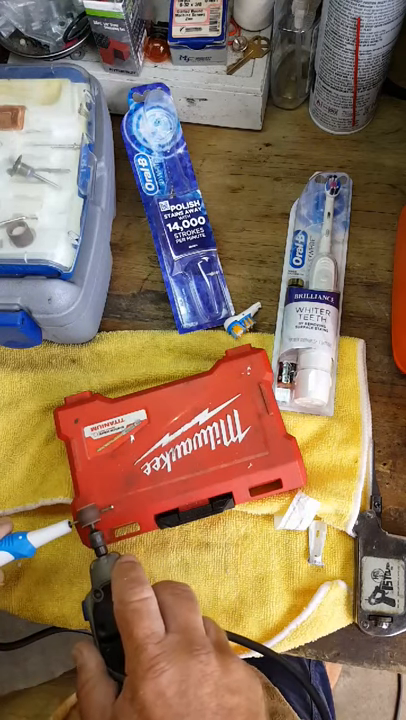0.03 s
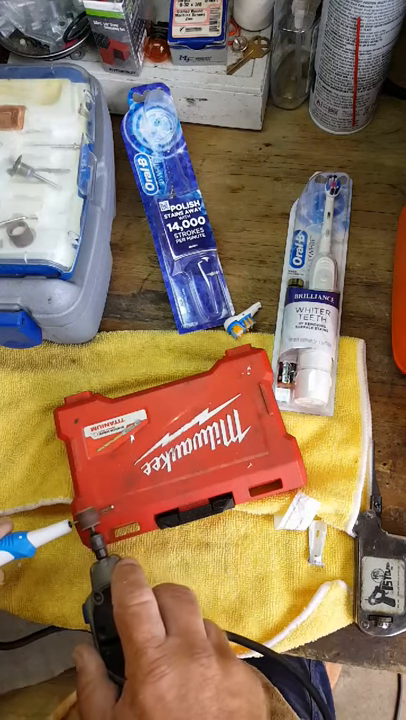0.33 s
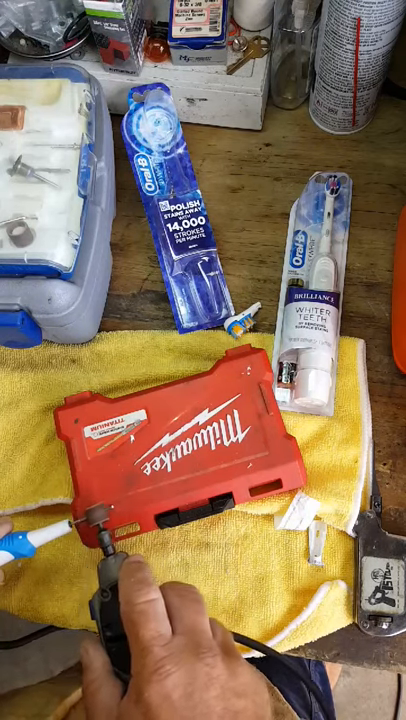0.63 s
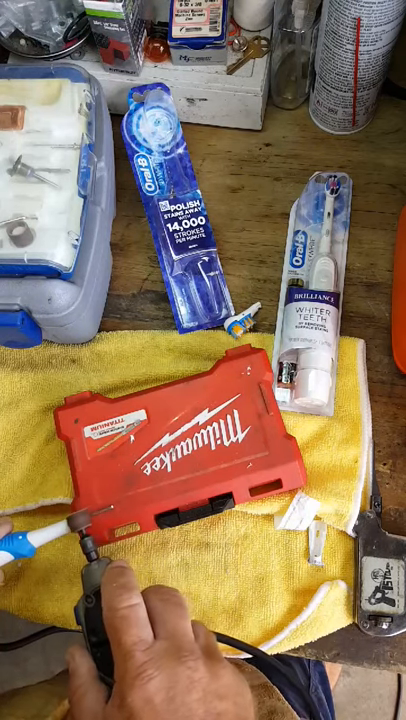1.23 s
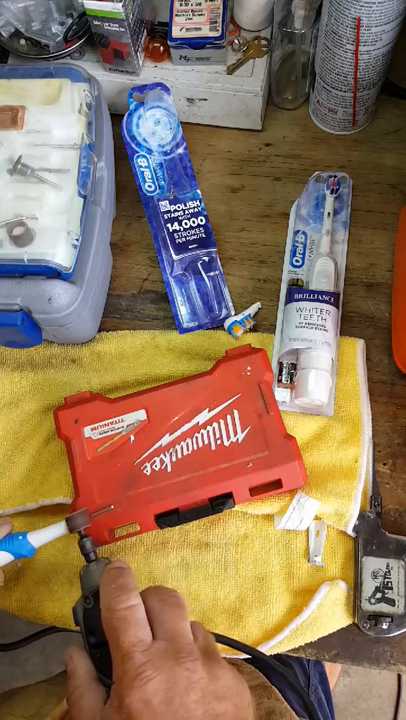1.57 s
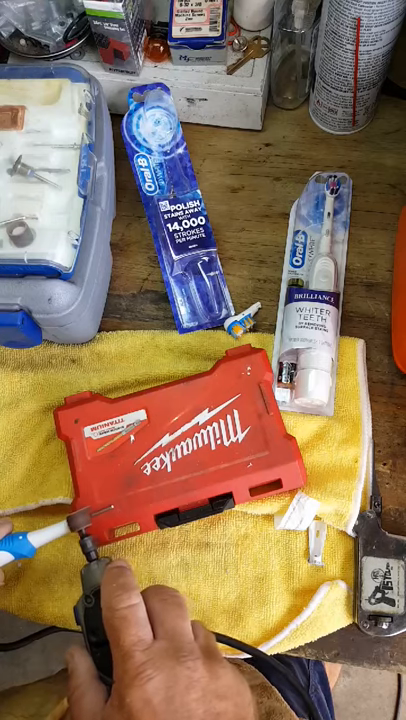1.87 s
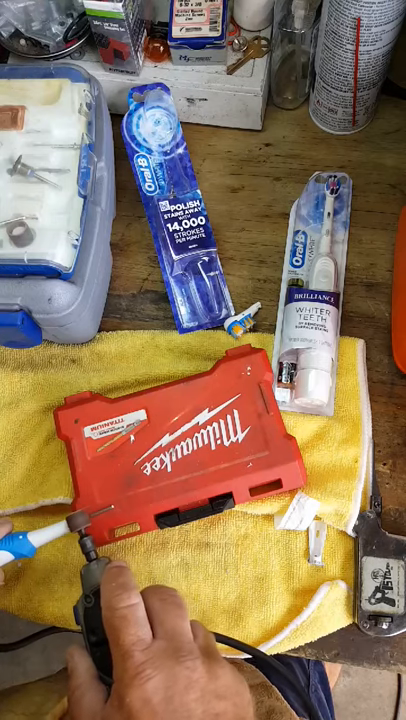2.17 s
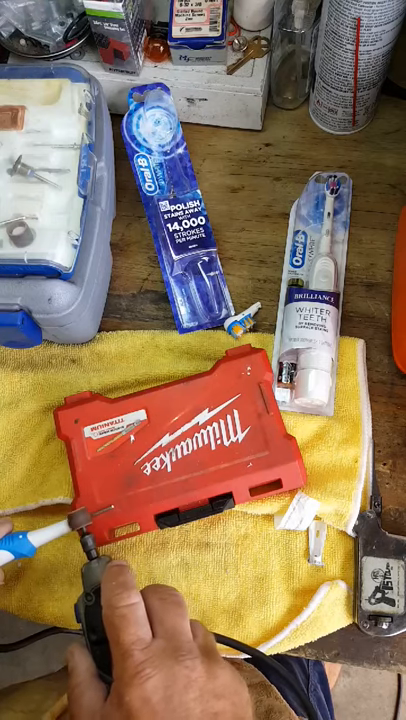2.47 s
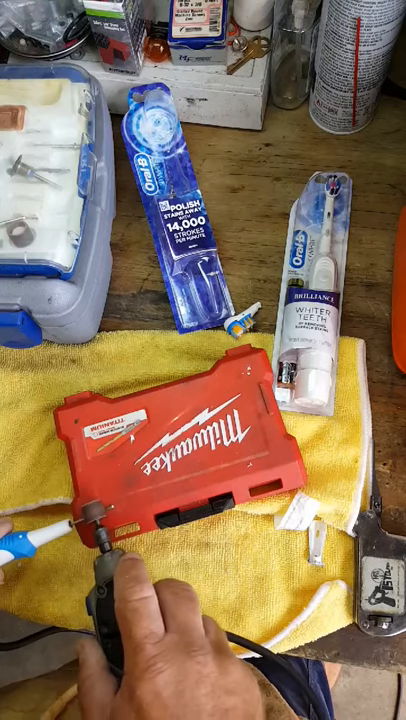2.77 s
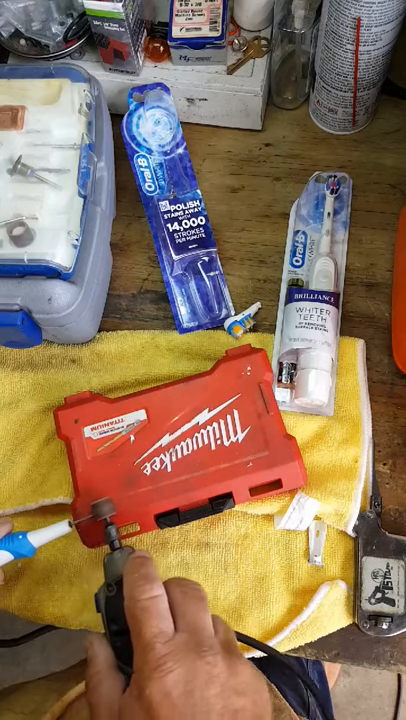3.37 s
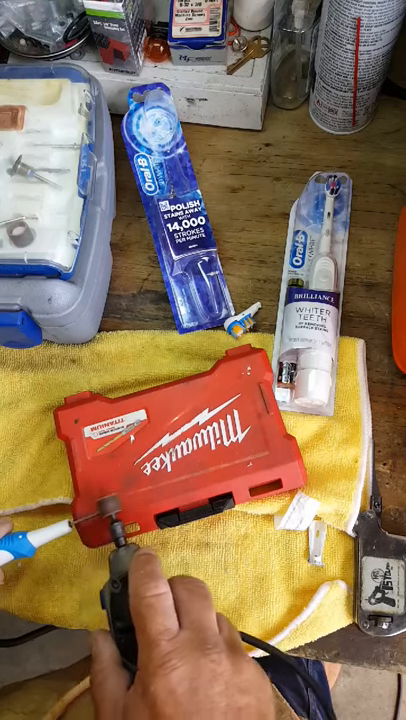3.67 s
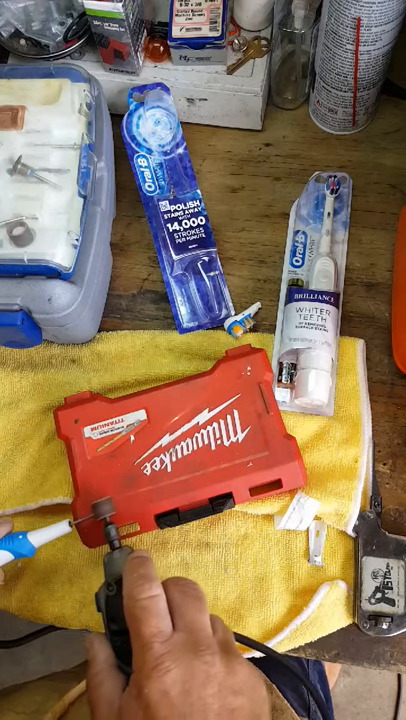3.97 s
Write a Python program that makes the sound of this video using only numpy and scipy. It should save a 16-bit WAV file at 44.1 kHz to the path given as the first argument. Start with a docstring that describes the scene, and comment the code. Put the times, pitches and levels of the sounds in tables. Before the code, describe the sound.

A small rotary tool buzzes steadily at full speed, its bit rattling against plastic.

```python
"""A small rotary tool runs at full speed on a workbench, its bit held against a plastic toothbrush head.
From the start the motor hums and buzzes, cooling air hisses from the vents, and the bit knocks and
rattles once a turn as the hand's pressure shifts. Two bright scrapes and three fits of chatter come in
the first second; the bit then runs more evenly until it chatters and scrapes again from 2.3 s. The
knocking is heaviest near 2.8 s, the pitch sags a little, and a last scrape comes just before 4 s."""
import sys
import numpy as np
from scipy import signal
from scipy.fft import rfft, irfft, next_fast_len
from scipy.io import wavfile
from scipy.ndimage import uniform_filter1d, map_coordinates

SR = 44100
rng = np.random.default_rng(int(sys.argv[2]) if len(sys.argv) > 2 else 0)


def master_out(mix):
    """Clip the mix to full scale and print it as 16-bit PCM to the path in sys.argv[1]."""
    frames = np.transpose(np.atleast_2d(mix))
    ceiling = np.clip(frames, -1, 1)
    pcm = np.round(ceiling * 32767).astype(np.int16)
    wavfile.write(sys.argv[1], SR, pcm)


N = 176400
MAINS_HZ, RIPPLE = 120, 0.071  # torque ripple: rate (twice the mains frequency) and depth
SIDES = np.array([[-.5], [.5]])  # left, right
BODY_HZ = np.fft.rfftfreq(2048, 1 / SR)  # frequency grid of the resonant bodies

# envelope of the bit's knock, loosely followed by the rush of air: t/s, relative level/dB
KNOCK_ENVELOPE = [(0.0, -27), (0.17, -35), (0.19, -25), (1.2, -31.5), (1.65, -28), (2.23, -29.5),
                  (2.28, -26), (2.38, -32), (2.53, -20.5), (2.68, -28.5), (2.77, -19), (2.82, -15.5),
                  (2.85, -30), (2.96, -24), (2.99, -20), (3.15, -28.5), (3.29, -19.5), (3.38, -26),
                  (3.88, -26), (3.95, -33), (4.0, -24.5)]
# stereo image: f/Hz, phase lead of the right channel/rad
STEREO_PHASE = [(100,0),(500,0.7),(950,0.3),(1200,0.81),(1700,2.06),(2550,-0.95),(3050,2.26),(3550,2),(4050,1.51),(4800,2),(5400,1.32),(6200,3),(7800,1),(8600,1.14),(10000,1.13),(15000,2.02)]


def motor(turns):
    """Unbalance gives two low tones, the mains a thrum; each turn rings the casing and the bearings."""
    # envelopes of the hum (shaft rate), drone (its octave) and casing buzz: t/s, relative level/dB
    hum_envelope = [(0,-36),(1.17,-33.5),(1.74,-29),(2.37,-33),(2.65,-29),(4,-35)]
    drone_envelope = [(0.0, -20.5), (0.09, -25), (0.53, -22.5), (0.6, -37.5), (0.69, -29.5), (2.13, -34),
                      (2.28, -25), (2.39, -35), (2.45, -29), (2.53, -31.5), (2.62, -23.5), (2.65, -41),
                      (2.78, -25.5), (2.92, -32.5), (2.97, -27.5), (3.34, -30), (3.38, -25), (3.45, -38),
                      (3.51, -27.5), (3.58, -32.5), (3.68, -24), (3.77, -32.5), (3.83, -25), (3.87, -35),
                      (4.0, -23.5)]
    buzz_envelope = [(0,-32),(.05,-19.5),(.17,-27),(.5,-28.5),(.55,-24),(.63,-32),(.75,-21),(1.42,-27.5),(2.31,-25.5),(2.38,-28),(2.84,-34),(3.12,-26),(3.72,-23),(3.96,-29.5)]
    # resonances of the casing and the bearings: f/Hz, level/dB
    casing = [(500,-52),(700,-5),(950,-8.5),(1200,-2),(1450,-8.5),(1670,-4),(1900,-2.5),(2150,-7.5),(2550,-0.5),(3050,-14.5),(3300,-13),(3560,4),(3800,5),(4050,5),(4300,-3),(4700,-44),(5500,-55.5),(8000,-42)]
    bearings = [(3800,-14),(4450,3),(4750,8),(5000,-4),(5400,4.5),(5900,5.5),(6250,-7.5),(6900,3),(7750,-4.5),(8200,-1),(9500,-15),(12000,-15.5),(15500,-18.5)]
    hum = amp(curve(hum_envelope) - 1.5 + 1.6 * wobble(23)) * np.sin(2 * np.pi * turns)
    drone_gain = amp(curve(drone_envelope) + .5 + 2.44 * wobble(35)) * (1 + 1.25 * RIPPLE * mains())
    drone = drone_gain * np.sin(2 * np.pi * 2 * turns + 0.15 * wobble(24.91))
    thrum = amp(-54.5 + 4 * wobble(22)) * mains()
    pulses = blows(turns, at=0, jitter_s=2e-6, scatter_db=.55, sway_s=2e-6)
    buzz = struck(pulses, casing, wander=.5, wander_rate=18, spread_s=.003)
    pulses = blows(turns, at=.3, jitter_s=2e-6, scatter_db=1, sway_s=2e-6)
    whine = struck(pulses, bearings, wander=1, wander_rate=14, spread_s=.003)
    return (np.sqrt(2) * (hum + drone + thrum)
            + amp(curve(buzz_envelope) + 2 + 1.5 * wobble(26.48)) * buzz
            + amp(-25 + 0.53 * wobble(23)) * whine)


def bit(turns):
    """The bit hits the plastic once a turn: a low knock, a bright rattle, coarse grinding as it bites."""
    # resonances of the three contact sounds: f/Hz, level/dB
    knock_body = [(450,-44.5),(700,-5.5),(930,3),(1170,-1),(1400,0.5),(1700,-10),(2200,-35),(3500,-52)]
    rattle_body = [(1200,-22.5),(1800,-10.5),(2150,-10.5),(2380,-0.5),(2850,1.5),(3100,-2.5),(3350,-4),(3600,-14),(4700,-5.5),(6200,-30.5),(7100,-11),(10000,-73.5),(15000,-42.5)]
    grind_body = [(700,-17),(1200,-10),(1800,1),(2700,1.5),(3400,4.5),(12000,-10)]
    # envelope of the rattle: t/s, relative level/dB
    rattle_envelope = [(0.01, -22), (0.05, -31), (0.22, -18), (0.33, -31), (0.4, -19), (0.45, -20),
                       (0.53, -20.5), (0.64, -23), (0.7, -31.5), (0.83, -20.5), (0.93, -21), (0.97, -24),
                       (1.01, -34), (1.24, -27), (1.33, -30.5), (1.39, -26), (1.52, -33.5), (1.74, -25),
                       (1.87, -34), (1.93, -27), (2.2, -35.5), (2.27, -21.5), (2.37, -36), (2.56, -20),
                       (2.59, -27.5), (2.73, -27.5), (2.78, -20.5), (2.87, -28), (2.96, -27.5), (2.98, -18),
                       (3.07, -21.5), (3.18, -29), (3.28, -19.5), (3.53, -29.5), (3.58, -21.5), (3.84, -29),
                       (3.87, -20), (3.99, -21)]
    pulses = blows(turns, at=.4833, jitter_s=1.6e-5, scatter_db=.84, sway_s=8e-5)
    knock = struck(pulses, knock_body, wander=.73, wander_rate=18, spread_s=.003486)
    pulses = blows(turns, at=.102, jitter_s=8e-6, scatter_db=1.4, sway_s=1e-5)
    rattle = struck(pulses, rattle_body, wander=1, wander_rate=28, spread_s=.002972)
    pulses = blows(turns, at=.0993, jitter_s=3e-5, scatter_db=3, sway_s=2e-5)
    grind = struck(pulses, grind_body, wander=.7, wander_rate=33, spread_s=.0024)
    rattle_db = curve(rattle_envelope)
    bite_db = rattle_db - np.median(rattle_db)
    return (amp(curve(KNOCK_ENVELOPE) - 2.5 + 1.8 * wobble(29.46)) * knock
            + amp(rattle_db + 1.5 + 0.68 * wobble(33.92)) * rattle
            + amp(-32.5 + 1.27 * bite_db) * grind)


def chatter(turns):
    """In short fits the bit bounces on every second turn and rings the plastic head."""
    # fits of bouncing: t/s, length/s, level/dB, resonance f/Hz
    fits = [(.54,0.022,-36,1080),(.625,0.047,-25,1070),(0.744,0.083,-30,593),(2.312,0.049,-32,617),(3.054,0.055,-23.5,980)]
    # tone of the plastic head: multiple of the resonance, level/dB
    head = [(.1,-5),(.5,-10),(1,-1),(1.7,-3),(6,-43)]
    bounces = blows(turns / 2, at=.296, jitter_s=6e-5, scatter_db=1.5, sway_s=1e-5)
    out = 0
    for at_s, length_s, db, ring_hz in fits:
        body = ringing([(ring_hz * k, level) for k, level in head], BODY_HZ)
        response = irfft(body * stereo(BODY_HZ) * paths(BODY_HZ, spread_s=.002))[:, :1024]
        ring = signal.oaconvolve(bounces[None], response, axes=1)[:, :N]
        out = out + amp(db) * swell(at_s, length_s) * unit(ring)
    return out


def scrapes(turns):
    """The bit's edge catches: spurts of bright friction noise, pulsing with each turn."""
    # catches of the edge: t/s, length/s, level/dB
    spurts = [(0.145,.05,-22),(0.484,0.048,-21.5),(2.65,0.051,-29),(3.929,.06,-23)]
    # colour of the friction: f/Hz, level/dB
    friction = [(6300,-20.5),(8800,3),(12000,1),(15500,-11)]
    envelope = sum(amp(db) * swell(at_s, length_s) for at_s, length_s, db in spurts)
    return envelope * air(friction, width=.3) * pulsing(turns, depth=.53)


def hiss(turns):
    """The vents' whine and the bit's rasp, each part pitched and part noise, over a low rush of air."""
    # colours of the three layers: f/Hz, level/dB
    vent_colour = [(3000,-28),(5000,-42),(6300,-64),(7200,-4),(8000,-18.5),(8500,1),(9000,-3.5),(9600,-10),(11500,-18.5),(15000,-38)]
    rasp_colour = [(3000,-13),(8000,7),(10000,7),(11700,8.5),(15800,-4.5)]
    rush_colour = [(25,-34),(55,-5),(150,-4.5),(200,1.5),(300,-8),(420,0.5),(950,0.5),(1750,-1.5),(2600,-6),(12000,-46)]
    # envelopes of the vents and the rasp: t/s, relative level/dB
    vent_envelope = [(1.33,-32.5),(1.38,-29.5),(2.6,-30),(2.8,-32)]
    rasp_envelope = [(.9,-36),(1,-38),(1.3,-47),(1.42,-35),(2.8,-39.5)]
    pulses = blows(turns, at=.1998, jitter_s=4e-6, scatter_db=1.5, sway_s=3e-6)
    whine = struck(pulses, vent_colour, wander=1, wander_rate=26, spread_s=.003)
    vent = unit(air(vent_colour, width=.8) * pulsing(turns, depth=.35) + whine)
    pulses = blows(turns, at=1, jitter_s=3e-6, scatter_db=1.5, sway_s=2e-6)
    rub = struck(pulses, rasp_colour, wander=.67, wander_rate=14, spread_s=.0028)
    rasp = unit(.76 * air(rasp_colour, width=.58) * pulsing(turns, depth=.31) + rub)
    knock_db = curve(KNOCK_ENVELOPE)
    rush_db = -34.5 + .3 * (knock_db - knock_db.mean()) + 1.2 * wobble(14)
    rush = amp(rush_db) * air(rush_colour, width=.26)
    return (amp(curve(vent_envelope) + 4.5 + 3.1 * wobble(23.72)) * vent
            + amp(curve(rasp_envelope) + 4 + 1.3 * wobble(32.7)) * rasp + rush)


def bench(x, t60_s=.15, low_cut_hz=600):
    """Short reflections from the cluttered workbench."""
    t = np.arange(SR // 4) / SR
    tail = rng.standard_normal((2, len(t))) * amp(-60 * t / t60_s)
    wet = signal.fftconvolve(x, tail / np.linalg.norm(tail[0]), axes=1)[:, :N]
    return filtered(wet, lambda hz: hz / (hz + low_cut_hz))


def blows(turns, at, jitter_s, scatter_db, sway_s):
    """One uneven pulse a turn, at fraction `at` of the turn; torque ripple sways its timing and size."""
    turn = np.arange(1, int(turns[-1]))
    chance = rng.standard_normal((len(turn), 2))
    when = np.interp(turn + at, turns, np.arange(N))
    torque = mains()[when.astype(int)]
    when = when + SR * (jitter_s * chance[:, 0] + sway_s * torque)
    size = amp(scatter_db * chance[:, 1]) * (1 + RIPPLE * torque)
    taps = when.astype(int)[:, None] + np.arange(-7, 9)
    offset = taps - when[:, None]
    click = np.sinc(offset) * np.cos(np.pi * offset / 16) ** 2  # can land between samples
    return np.bincount(np.clip(taps, 0, N - 1).ravel(), (size[:, None] * click).ravel(), N)


def struck(pulses, body, wander, wander_rate, spread_s):
    """Pulses ring a body; as the contact shifts, side paths fade in and out and change the colour."""
    image = stereo(BODY_HZ)
    routes = [(1, image, spread_s),
              (1.13 * wander * wobble(wander_rate), image, 2 * spread_s),
              (0.76 * wander * wobble(wander_rate), image, 2 * spread_s),
              (1.43 * wander * wobble(wander_rate), SIDES, 2 * spread_s)]
    colour, out = ringing(body, BODY_HZ), 0
    for gain, pair, spread in routes:
        response = irfft(colour * pair * paths(BODY_HZ, spread))[:, :1024]
        drive = np.pad(pulses * gain, (response.shape[1] - 1, 0), mode="reflect")
        out = out + signal.oaconvolve(np.float32(drive)[None], np.float32(response), "valid", axes=1)
    power = uniform_filter1d(np.mean(unit(out) ** 2, axis=0), int(.06 * SR))
    return unit(out / np.sqrt(np.abs(power) + .01))  # ride the gain to keep the level even


def ringing(points, hz):
    """Minimum-phase response with the given colour, rolled off below its first point."""
    low_cut = 1 + (points[0][0] / (hz + 20)) ** 2
    cepstrum = irfft(np.log(amp(along(points, hz)) / low_cut))
    half = len(cepstrum) // 2
    return np.exp(rfft(np.r_[cepstrum[0], 2 * cepstrum[1:half], np.zeros(half)]))


def paths(hz, spread_s):
    """Each frequency takes its own short way through the parts: delay without colour."""
    delay = .001 + spread_s * np.interp(hz, np.linspace(0, SR / 2, num=60), rng.random(60))
    return np.exp(-2j * np.pi * np.cumsum(delay) * hz[1])


def air(colour, width):
    """Coloured stereo noise of rms 1, wider towards the treble."""
    hz = np.fft.rfftfreq(N, 1 / SR)
    mid, side = rfft(rng.standard_normal((2, N)))
    pair = mid * stereo(hz) + 2 * SIDES * side * width * hz / (hz + 400)
    return unit(irfft(pair * amp(along(colour, hz)), N))


def stereo(hz):
    """Left and right phase shifts that place the tool in the image."""
    return np.exp(1j * SIDES * along(STEREO_PHASE, hz))


def mains():
    """The pulsing of the motor's torque, between -1 and 1."""
    return np.sin(2 * np.pi * MAINS_HZ * np.arange(N) / SR)


def pulsing(turns, depth):
    """A gain of rms 1 that peaks once a turn."""
    return unit(np.exp(depth * np.cos(2 * np.pi * turns)))


def swell(at_s, length_s):
    """A rounded rise and fall of height 1."""
    return np.exp(-2 * ((np.arange(N) / SR - at_s) / length_s) ** 2)


def wobble(rate):
    """A smooth random curve, rate knots a second."""
    at = np.linspace(0, N, num=1200)
    drift = map_coordinates(rng.standard_normal(512), [at * rate / SR], mode="wrap")
    return np.interp(np.arange(N), at, drift)


def curve(rows):
    """An envelope through (t/s, value) points, one value per sample."""
    return np.interp(np.arange(N) / SR, *np.transpose(rows))


def along(points, hz):
    """(f/Hz, value) points read on a log axis."""
    f, v = np.transpose(points)
    return np.interp(np.log(hz + 1), np.log(f), v)


def filtered(x, response):
    """Equalise x with a function of frequency."""
    size = 2 * next_fast_len(N // 2 + 8192)
    return irfft(rfft(x, size) * response(np.fft.rfftfreq(size, 1 / SR)), size)[..., :N]


def amp(db):
    """Decibels to gain."""
    return 10 ** (np.asarray(db) / 20)


def unit(x):
    """Scale to rms 1."""
    return x / np.sqrt(np.mean(x ** 2) + 1e-20)


def scene():
    """One shaft drives the tool's layers; the bench reflects them faintly, and each band is panned."""
    # shaft speed: t/s, f/Hz
    speed = [(0.0, 242.0), (0.15, 239.5), (0.53, 238.5), (0.8, 239.1), (1.3, 235.9), (1.49, 237.5),
             (1.95, 237.0), (2.26, 235.9), (2.52, 239.4), (3.23, 232.7), (3.4, 233.6), (3.53, 231.6),
             (3.8, 233.9), (3.91, 231.2), (4.0, 236)]
    # stereo balance: f/Hz, left minus right level/dB
    balance = [(240,1.5),(480,-1),(720,-5.5),(950,4.5),(1170,-1.5),(1420,7.5),(1900,2),(2700,1),(3150,4.5),(3560,-4),(4100,-4.5),(4700,0),(5300,-1.5),(5900,1.5),(6600,8.5),(7600,-4.5),(8600,0),(10000,0),(15000,0)]
    turns = np.cumsum(curve(speed) + 0.303 * wobble(26)) / SR
    tool = motor(turns) + bit(turns) + chatter(turns) + scrapes(turns) + hiss(turns)
    mix = tool + amp(-19) * bench(tool)
    return filtered(mix, lambda hz: amp(-SIDES * along(balance, hz)))


def record(dry, top_hz=15800):
    """A brick-wall high cut on the mix."""
    return filtered(dry, lambda hz: hz < top_hz)


dry = scene()
out = record(dry)
master_out(out)
```